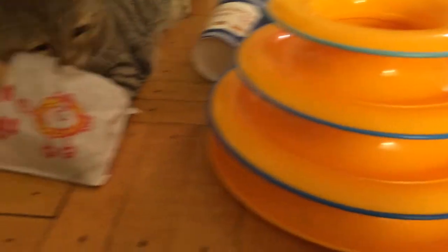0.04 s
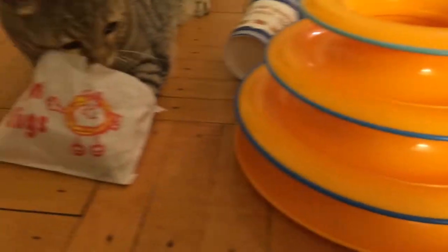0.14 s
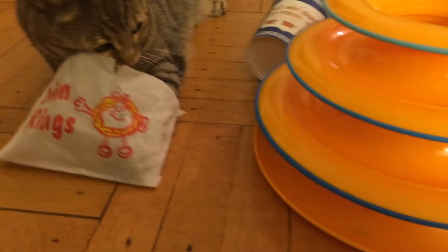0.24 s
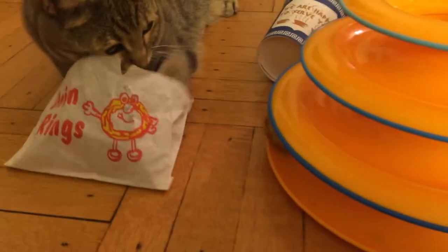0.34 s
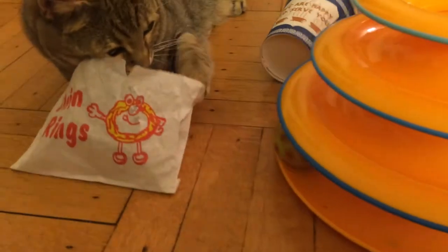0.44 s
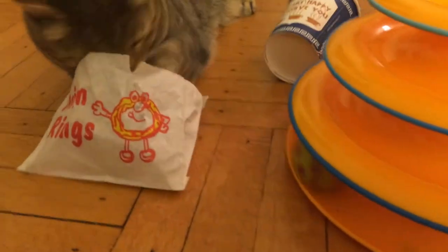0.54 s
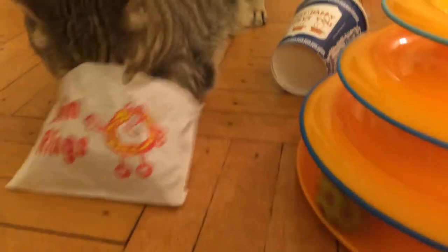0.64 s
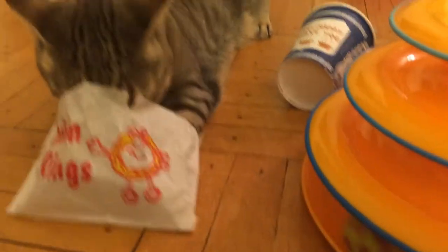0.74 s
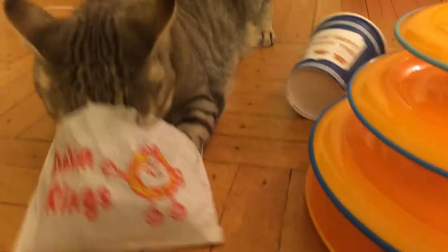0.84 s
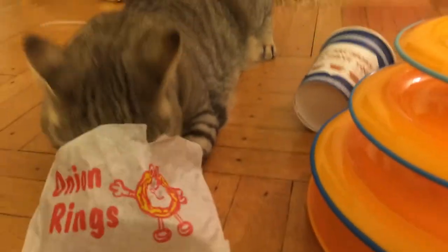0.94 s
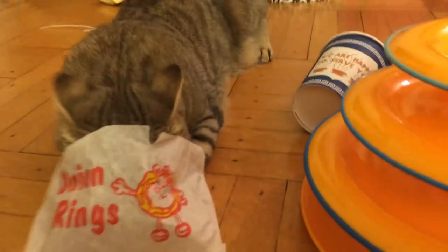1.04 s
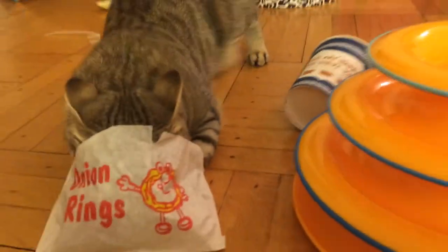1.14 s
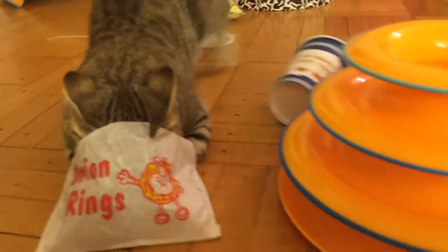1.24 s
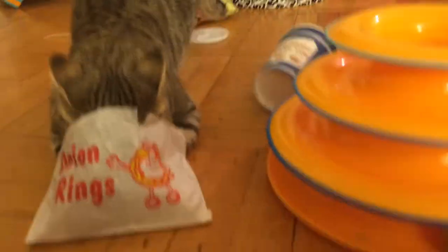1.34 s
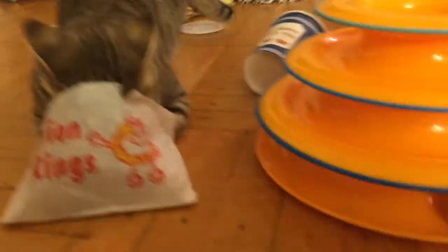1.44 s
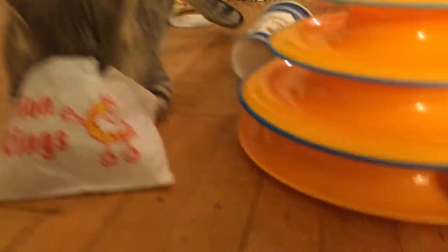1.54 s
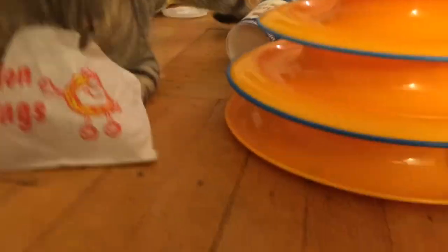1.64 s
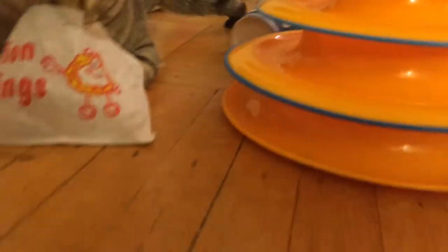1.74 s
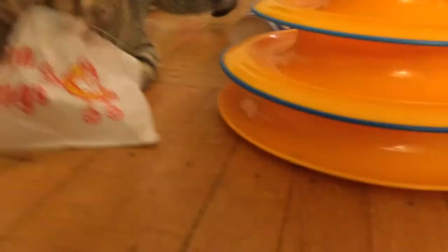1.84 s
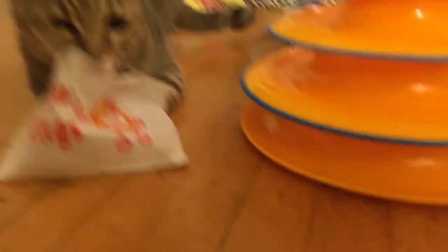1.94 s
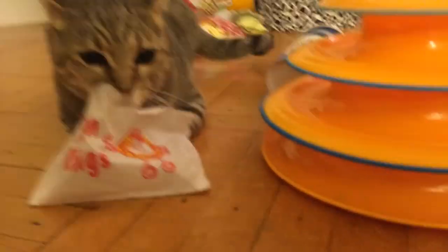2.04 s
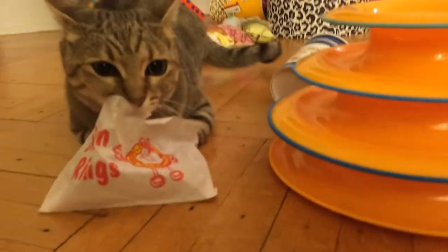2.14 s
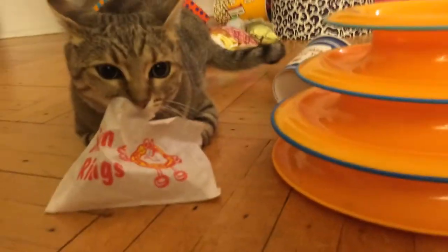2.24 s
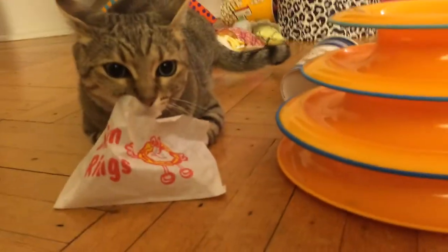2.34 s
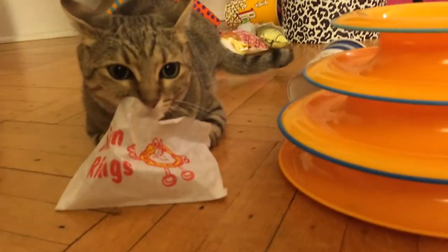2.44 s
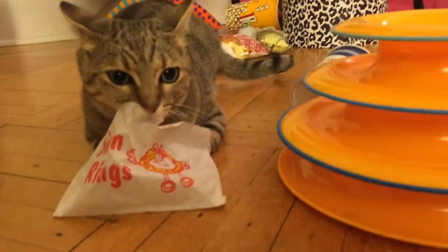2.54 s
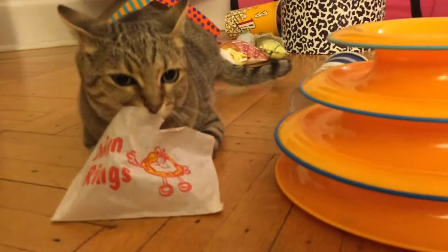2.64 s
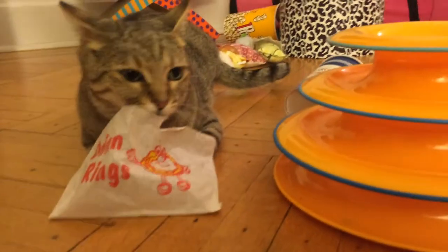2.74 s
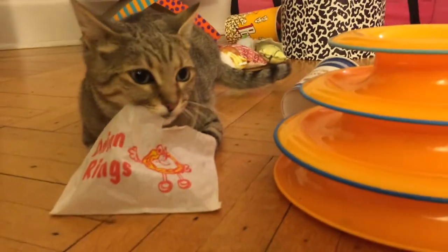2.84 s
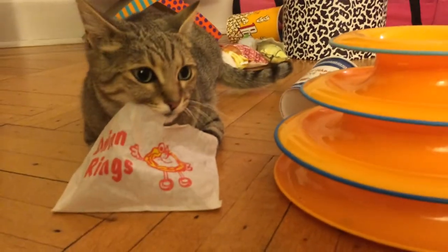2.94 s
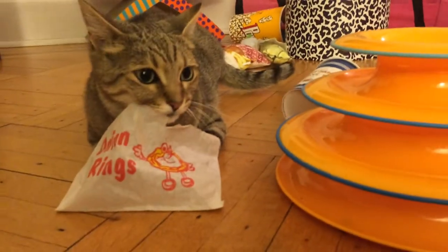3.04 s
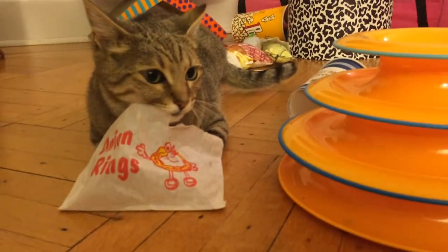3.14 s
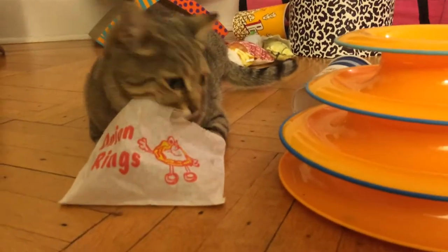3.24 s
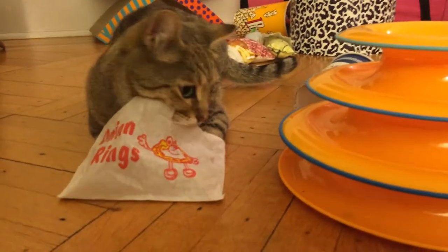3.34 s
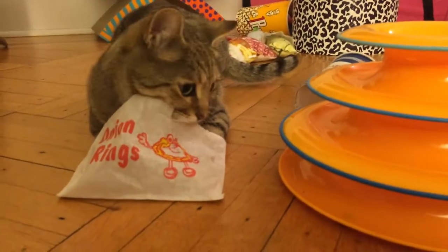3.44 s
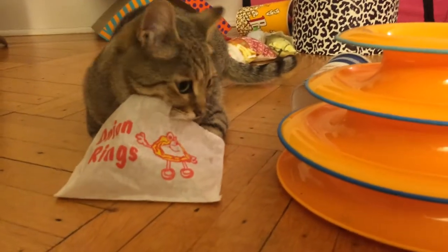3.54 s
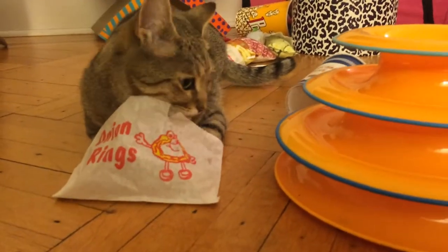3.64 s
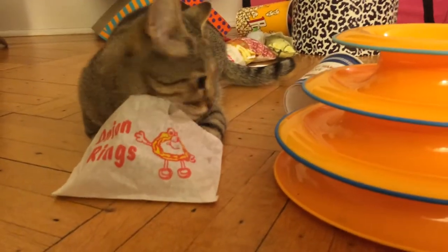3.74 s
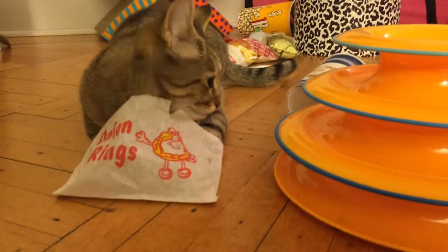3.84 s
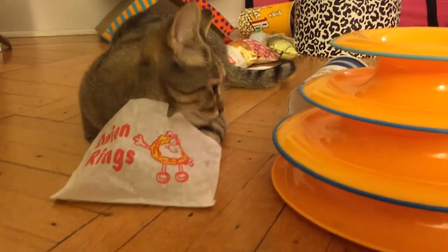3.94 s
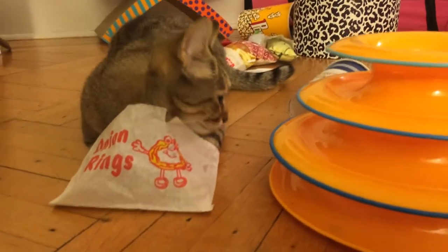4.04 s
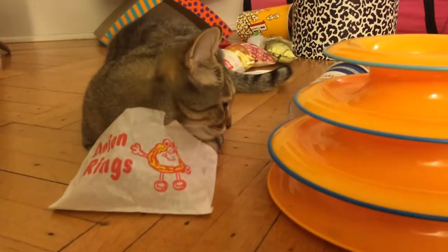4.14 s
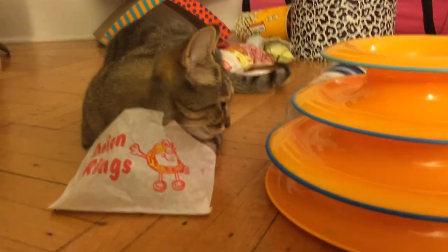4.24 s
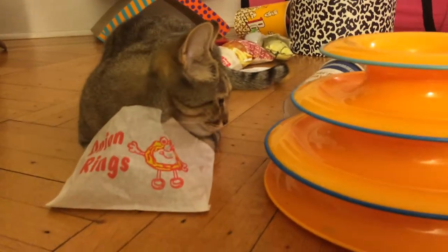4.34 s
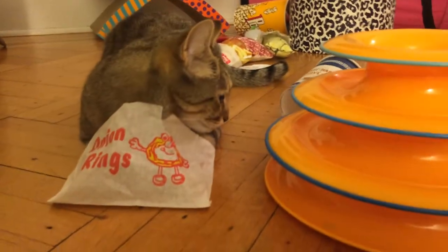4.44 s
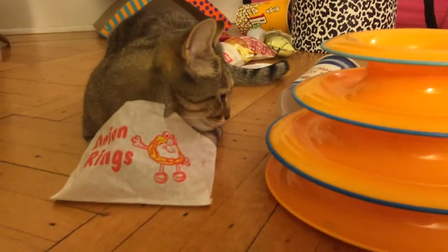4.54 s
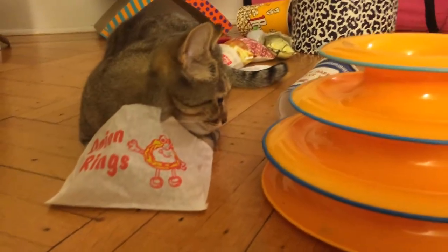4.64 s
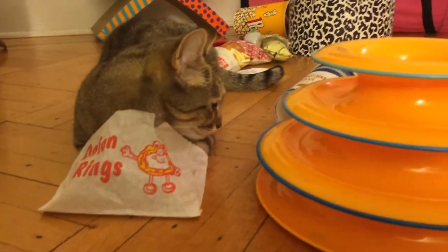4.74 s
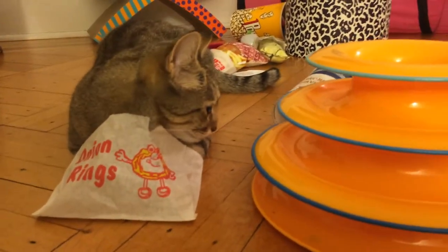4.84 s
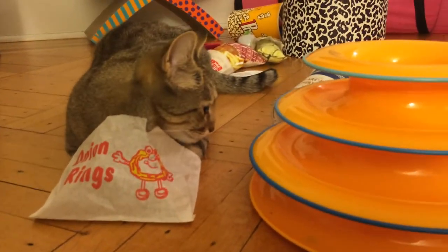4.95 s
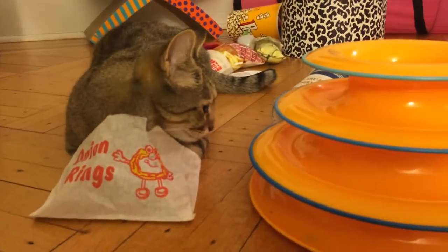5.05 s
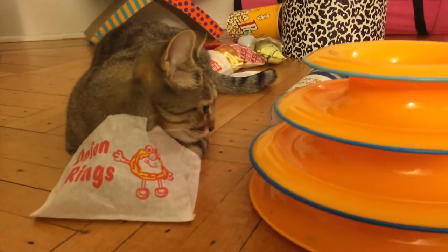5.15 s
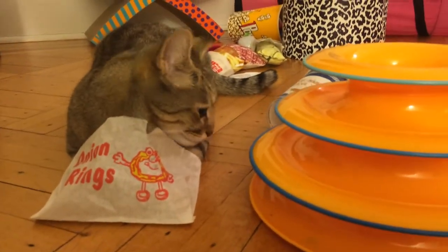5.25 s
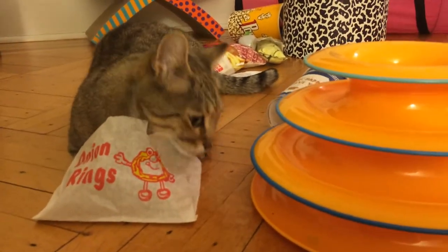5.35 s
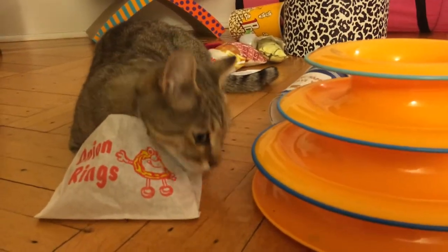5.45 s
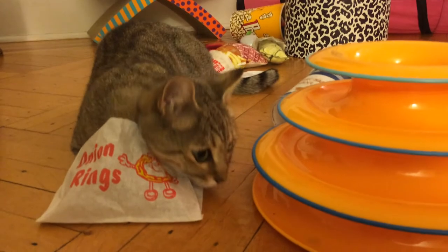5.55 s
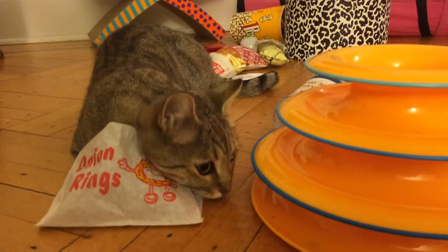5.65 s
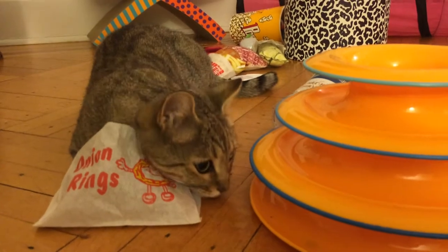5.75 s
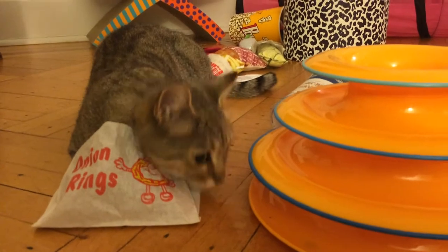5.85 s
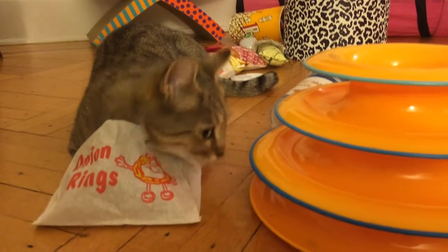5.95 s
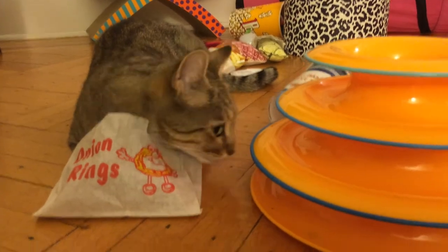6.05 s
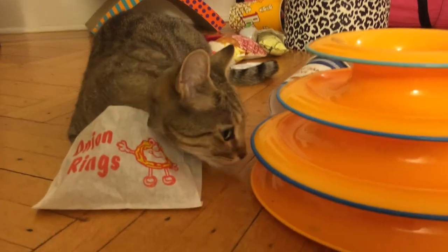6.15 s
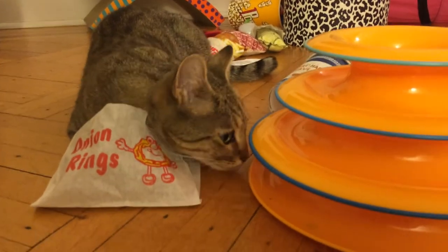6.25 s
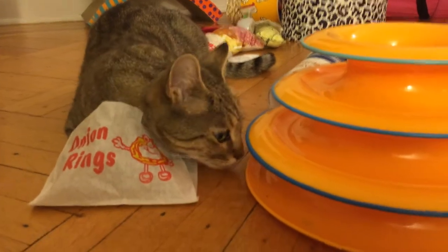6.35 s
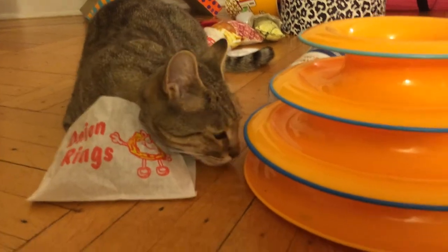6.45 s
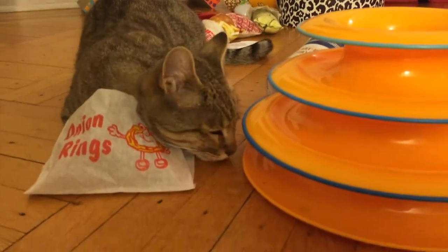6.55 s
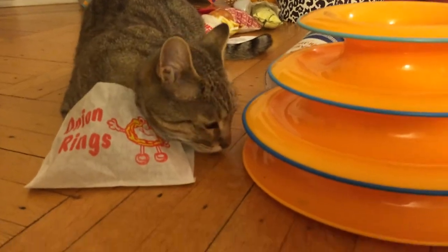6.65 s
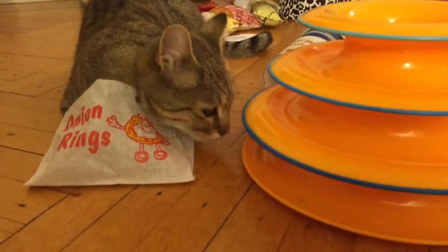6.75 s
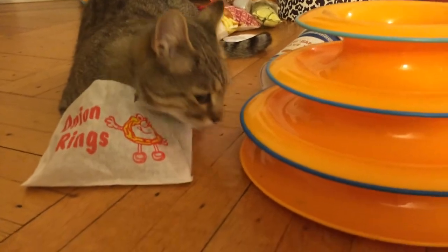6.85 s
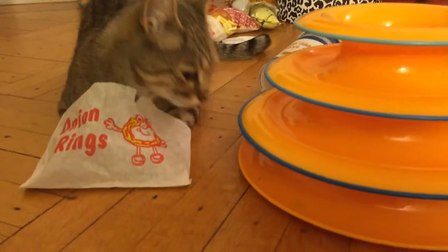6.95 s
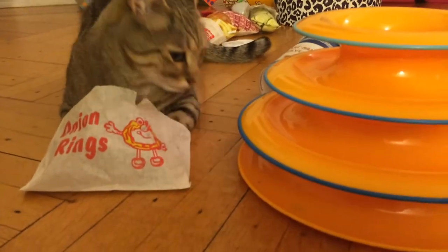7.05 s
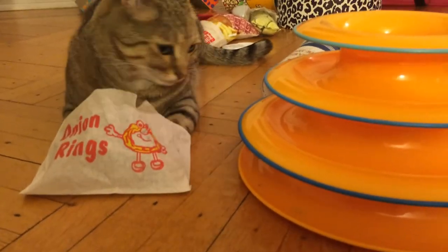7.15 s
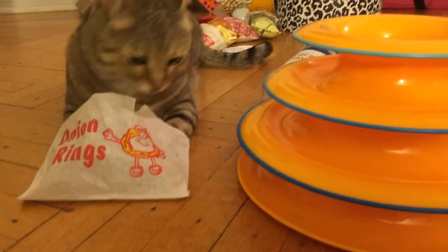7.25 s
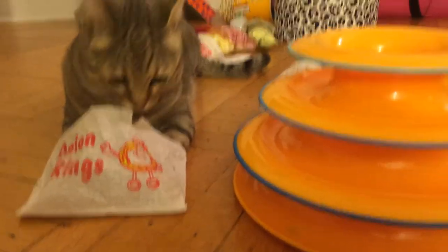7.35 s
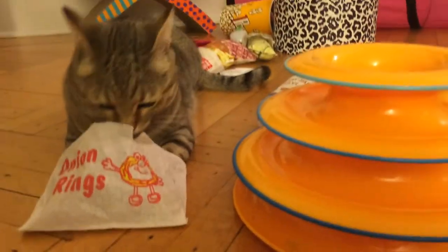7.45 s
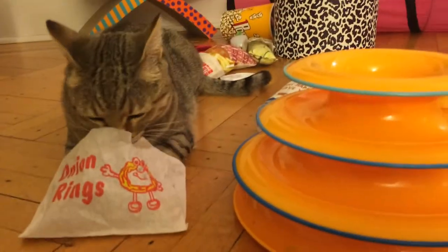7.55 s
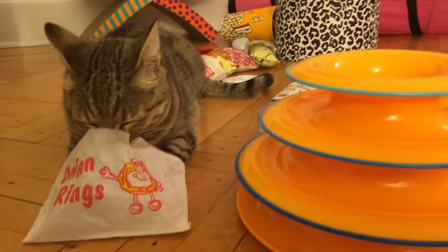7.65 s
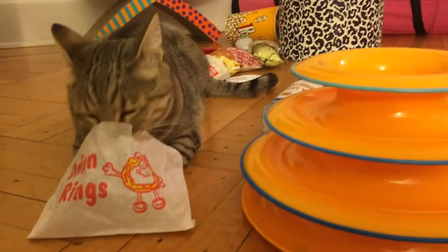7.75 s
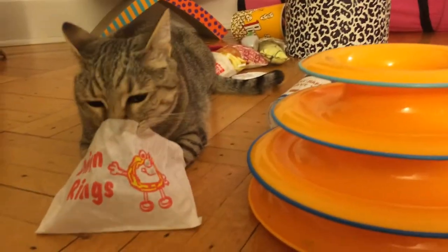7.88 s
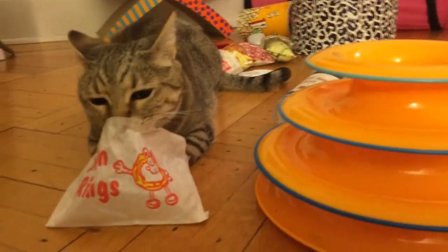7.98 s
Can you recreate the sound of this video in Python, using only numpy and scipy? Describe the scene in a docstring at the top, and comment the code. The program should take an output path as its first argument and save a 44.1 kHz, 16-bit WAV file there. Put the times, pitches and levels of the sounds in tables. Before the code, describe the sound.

Close phone pickup in a lightly reverberant room with a wooden floor and very faint low hum. From 0 to about 2.1 seconds a cat shoves into a small paper bag: ragged, bright creases snap in quick succession over grainy rustling, densest and loudest near 1 second, with hard individual cracks near 1.45, 1.9 and 2.05. Soft low bumps rumble in the boards, and a hint of hollow rolling lies underneath. The rustle drops away by 2.3. From 2.4 to 4.5 there are sparse light crinkles and gentle brushes, while something small patters softly in hollow plastic, clearest around 2.8 to 3.4 and again at 4.3. Dull, short wooden knocks come from further away at 4.65 and 6.6. Faint paper crackles and fur rubs cluster around 5.4 to 6, nearly vanish, then return from 7.4, growing a little livelier from 7.8 to the end.

```python
"""Wooden floor indoors: a cat noses, bites and leans on a small paper bag, close to a phone.
Creases snap as ragged noise bursts ringing the bag; fur and paper rub as streams of coloured slips.
Soft low-band noise bumps rumble in the boards during the shove. Two dull knocks further off ring wood
modes and the room.
Something small rolls and patters in plastic (narrow noise, dying sines) over a low household hum."""
import sys
import numpy as np
from scipy import signal
from scipy.fft import rfft, irfft, next_fast_len
from scipy.io import wavfile
from scipy.ndimage import uniform_filter1d

SR = 44100
rng = np.random.default_rng(int(sys.argv[2]) if len(sys.argv) > 2 else 0)


def digitize_waveform(pressure):
    """Quantize a signal to 16-bit integers and store it at the path in sys.argv[1].

    Rows of a 2-D input are taken as channels; values are limited to [-1, 1].
    """
    field = np.atleast_2d(pressure).T
    bounded = np.clip(field, -1, 1)
    quanta = np.round(bounded * 32767).astype(np.int16)
    wavfile.write(sys.argv[1], SR, quanta)


N = 353457

# household noise spectrum, relative: freq_hz [Hz], density_db [dB per Hz]
HOUSE_SPECTRUM = [(22, -27), (49, -18.5), (85, -13.5), (130, -15), (165, -20.5), (210, -14), (270, -22.5),
                  (400, -25.5), (600, -33.5), (1700, -39), (2500, -41), (7000, -44.5), (14700, -48)]
HOUSE_DB = -66
HUM_HZ, HUM_HALF_WIDTH_HZ, HUM_DB, HUM_WAVER_DB = 121.2, 12, -65.5, 2.5

# room tail bands: centre_hz [Hz], level_db [dB, relative], t60_s [s]
ROOM_BANDS = [(215.7, -3.5, 0.25), (527, 2, 0.13), (1040, 1.5, 0.22), (2000, 4, 0.19), (4000, -0.5, 0.38),
              (7040, -6, .28), (12300, -3, .17)]

# cat's weight landing on the boards: time_s [s], level_db [dB]
BUMPS = [(0.081, -45), (.62, -55), (.7, -51), (.83, -45.5), (0.941, -40.5), (1.1, -51), (1.33, -49),
         (1.47, -43.5), (1.508, -46.5), (1.74, -45), (1.87, -48.5), (1.95, -47), (2.041, -41.5)]
BUMP_RISE_DB_S, BUMP_FALL_DB_S, RUMBLE_DB = 699.5, 350, -61

# light object rolling in hollow plastic: start_s [s], length_s [s], level_db [dB]
ROLLS = [(0.188, .12, -66), (0.416, 0.27, -59.5), (0.803, 0.091, -57.5), (2.817, 0.096, -68.5),
         (3.127, 0.034, -66.5), (3.2, .09, -68.5), (3.352, 0.087, -70.5), (4.278, 0.19, -73),
         (4.679, 0.039, -67.5), (5.95, 0.29, -75)]
ROLL_HZ, ROLL_HALF_WIDTH_HZ, ROLL_RISE_DB_S, ROLL_FALL_DB_S = 550, 90, 250.5, 150.5

# soft taps, levels before trim: time_s [s], level_db [dB], ring_hz [Hz], thump_db [dB re level_db]
TAPS = [(2.402, -69, 653, 10), (2.638, -69.5, 400, 21), (2.809, -55.5, 550, 5), (2.871, -56, 420, 0),
        (3.022, -61, 468, -9), (3.067, -62.5, 500, -7.5), (3.124, -54, 480, -19), (3.193, -54.5, 486, -14),
        (3.239, -48, 550, -8), (3.303, -64, 600, -12), (3.351, -60.5, 470, -19), (3.413, -61.5, 583, -8),
        (4.032, -71.5, 483, -8.5), (4.307, -59.5, 493, -12), (4.355, -58, 487, -13),
        (4.406, -64.5, 490, -12.5), (4.519, -70.5, 560, 0.5), (4.879, -66.5, 632, -2), (6.42, -67, 400, 4),
        (7.489, -61, 360, -13.5)]

# far knocks: time_s [s], peak_db [dB]
KNOCKS = [(4.655, -29.5), (6.601, -25.5)]
# modes of the knocked wood: freq_hz [Hz], level_db [dB, relative], t60_s [s]
WOOD_MODES = [(223.7, -7.5, 0.029), (294.5, -9, 0.02), (420, -6.5, 0.023), (593, 0.5, 0.011),
              (1013, -6.5, 0.012), (1420, -7.5, 0.011), (1950, 1.5, 0.0044), (2500, 3.5, 0.0024),
              (3100, -11, 0.0051), (3690, -1, 0.0032), (4744, -10, 0.0039), (5370, -11, 0.0032),
              (6740, -8, 0.0013)]

# head shoved into the bag, levels before trim: time_s [s], treble_db [dB], body_db [dB]
SHOVE = [(0, -55, -57), (.12, -53, -49.5), (.3, -62.5, -52.5), (.42, -54, -52.5), (.56, -57.5, -57),
         (.62, -48.5, -48), (.83, -47, -46), (.9, -52.5, -49), (.97, -40, -37.5), (1.06, -42, -46.5),
         (1.24, -52.5, -48), (1.41, -53, -49.5), (1.5, -46, -46.5), (1.65, -39, -53), (1.73, -51, -59.5),
         (1.84, -57.5, -52), (2.05, -50.5, -43), (2.25, -72.5, -69)]
# brushes of fur and chin, levels before trim: start_s [s], length_s [s], treble_db [dB], body_db [dB]
BRUSHES = [(2.621, 0.18, -64.5, -64), (2.819, .15, -62.5, -66), (3.225, .18, -62.5, -61.5),
           (3.528, .05, -75, -65), (3.642, .25, -72.5, -67.5), (3.88, 0.14, -72.5, -76.5),
           (4.121, .17, -70, -70.5), (4.269, 0.045, -67.5, -68.5), (4.878, .15, -84, -67.5),
           (5.37, .15, -61.5, -68), (5.547, 0.22, -59, -61), (5.916, .1, -63, -62.5),
           (6.048, .12, -72.5, -63.5), (6.196, 0.11, -65, -67), (6.817, 0.15, -68.5, -79.5),
           (6.969, .04, -71.5, -61.5), (7.02, 0.11, -65, -72), (7.442, .07, -67, -67),
           (7.624, .12, -62.5, -63.5), (7.793, .12, -56, -54), (7.934, .1, -59, -58)]
BRUSH_RISE_DB_S, BRUSH_FALL_DB_S, REST_DB, SHOVE_ENDS_S = 300.5, 150.5, -82, 2.3
SHOVE_SPREAD_DB, BRUSH_SPREAD_DB, SLIPS_PER_S = 3, 1.5, 500  # spread: scatter of slip sizes
# rustle colour, body of the bag: freq_hz [Hz], density_db [dB per Hz, relative]
BODY_COLOUR = [(200, -26.5), (330, -4), (550, 0.5), (1000, 1), (2000, -3), (3000, -4), (5000, -20.5),
               (9000, -32)]
# rustle colour, thin paper and fur: freq_hz [Hz], density_db [dB per Hz, relative]
SKIN_COLOUR = [(1200, -27.5), (2500, -9), (4000, -7.5), (6500, 2.5), (9000, 2), (12000, -2.5), (15500, 1.5)]

# clearest creases, levels before trim: time_s [s], panel_db [dB], panel_hz [Hz],
# hollow_db [dB re panel], hollow_hz [Hz], treble_db [dB re panel], top_db [dB re panel]
CREASES = [(0.0454, -42, 3800, -5, 1290, 3.5, -4), (0.0545, -42.5, 3680, -12, 493, -9, -6.5),
           (0.0933, -34.5, 2360, -14, 580, -5, -10), (0.1007, -33.5, 3480, 4, 655, -1.5, -15),
           (0.1204, -32.5, 2480, -8, 544, -7.5, -2.5), (0.1367, -34, 1300, -4, 1236, -10, -17.5),
           (0.1514, -44.5, 1980, -12, 870, -4, -16), (0.2077, -25.5, 3360, -15.5, 1200, -14, -11),
           (0.2228, -36.5, 3300, -4.5, 965, -13.5, -21), (0.2423, -34.5, 2480, -20, 800, -6, -20),
           (0.2595, -39, 2720, -7, 764, -10, -15), (0.2689, -39.5, 2150, -2.5, 910, 1, -4),
           (0.289, -47, 2250, -10, 1090, -9, -10), (0.3042, -34, 3170, -25, 1170, -18, -22),
           (0.3559, -38, 1500, -8, 705, -2.5, -3), (0.3729, -42, 3460, -6, 1270, -2, 3),
           (0.3794, -29, 3240, -9, 1100, -4.5, -3), (0.398, -26.5, 3430, -16, 1050, -4.5, 4.5),
           (0.4054, -30.5, 3670, -18, 1230, -17, -12), (0.4251, -39, 2200, -2, 755, -2, -11),
           (0.4747, -37, 2650, -17, 507, -3, -1), (0.4929, -29.5, 1570, -16, 1310, -24, -31),
           (0.5028, -40, 3230, -24, 600, -16, -16), (0.5227, -33.5, 2500, -15, 506, -6.5, -14),
           (0.5929, -34.5, 1900, -6.5, 1080, -2.5, -10.5), (0.6519, -37, 2030, -14, 616, -16, -13),
           (0.6938, -26.5, 1880, -14, 1120, 1, 8), (0.7511, -35, 2110, -3.5, 920, -7, -5),
           (0.7801, -25.5, 3330, -16, 557, -2.5, -4), (0.794, -40, 1850, -9, 902, -6, -15),
           (0.819, -28, 1890, -9.5, 500, -15, -15), (0.839, -27.5, 3760, -7, 829, -4, -4),
           (0.846, -33, 3800, -8.5, 503, -4, -9), (0.8606, -34.5, 3400, -13.5, 759, -8, -5),
           (0.8838, -28.5, 3120, -17, 1040, -11.5, -13), (0.9219, -36.5, 1840, -10.5, 950, -8, 1),
           (0.9334, -27.5, 2840, -9, 730, 1.5, -17), (0.9388, -19, 3240, -17, 860, -12, -5),
           (0.9449, -20.5, 1880, -11, 990, -10, 1), (0.9524, -15, 3250, -10.5, 960, -9.5, -20),
           (0.9592, -19, 2920, -15, 705, -17, -20), (0.975, -27, 2810, -18, 1150, -14, -15),
           (0.9851, -21, 1740, -12, 1040, -5.5, -8), (0.9902, -21, 3530, -21, 923, -19, 4.5),
           (1.0078, -25, 1800, -13, 953, -3, -6), (1.0144, -19.5, 2000, -21, 654, -3.5, -2.5),
           (1.0253, -25, 1860, -20, 580, -5.5, -12), (1.036, -18, 1820, -28, 1300, -14, -15),
           (1.042, -26.5, 3070, -22.5, 977, -7, 2.5), (1.0498, -23.5, 3090, -27, 853, -2.5, -12),
           (1.0717, -29, 2960, -26, 990, -6, -11), (1.094, -40, 3380, -30, 930, 9, -4),
           (1.1035, -20, 2556, -15, 1330, -6, -5), (1.124, -18, 2650, -20, 1300, -7, -6),
           (1.134, -31, 2640, -22, 1290, -14, -16), (1.156, -36, 2230, -27.5, 463, -1, 1),
           (1.1714, -30.5, 2030, -30, 1070, -9, -4), (1.1775, -27.5, 1920, -30, 1180, -7, -11),
           (1.1858, -32, 3300, -5.5, 580, -9, -1), (1.1942, -33.5, 1850, -14, 958, -5, 2),
           (1.2027, -33.5, 1470, -17.5, 1300, 1, 6.5), (1.2069, -24, 2030, -27, 931, -4, -8),
           (1.2105, -24, 1910, -19, 1040, -6, -17), (1.2174, -29.5, 1740, -18.5, 1310, -6, -14),
           (1.2581, -28.5, 2700, -32, 926, -3, -5), (1.265, -25.5, 3300, -27, 607, -9, -4),
           (1.2777, -31, 2030, -31, 1060, -4, -7), (1.2966, -32, 3410, -20, 1210, -6, -3),
           (1.3278, -24.5, 2050, -11, 635, -13, -11), (1.3398, -29.5, 2790, -16, 570, 2, 4),
           (1.3449, -32.5, 1960, -11, 1060, -1, -8), (1.4189, -35.5, 2070, -16, 643, 0, -12),
           (1.424, -33.5, 1810, -10, 1180, -3.5, -14), (1.4424, -30.5, 2000, -7, 705, -6, -23),
           (1.4546, -14, 2170, -17, 714, -8.5, -9), (1.4849, -20, 1950, -21.5, 398, -9.5, -6),
           (1.4924, -38, 1930, -6, 577, -1, -4), (1.508, -30.5, 1960, -2.5, 740, -0.5, 1),
           (1.5404, -36, 2240, -13, 912, -17, -15), (1.5932, -27, 2260, -4, 860, -18, -16),
           (1.6274, -23, 2060, -38, 973, -21, -11), (1.6625, -34, 2980, -17, 826, -21, -10),
           (1.694, -38.5, 2290, -7.5, 486, -16, -15), (1.7428, -31.5, 2230, 5, 840, -3, -8),
           (1.7593, -37, 1440, -3, 770, -2, 4), (1.7662, -29.5, 2010, -7, 1140, -5, -7),
           (1.8072, -45, 2000, -11, 888, -1, -8), (1.8235, -37, 1440, -8.5, 845, -5.5, -18),
           (1.8552, -39, 2000, -2, 450, -14, -16), (1.8801, -15.5, 2210, -10, 620, -14.5, -25),
           (1.8956, -40.5, 2210, 2, 797, 4, -4), (1.9096, -31, 1920, -14, 1150, -13, -13),
           (1.9196, -37.5, 1950, -4.5, 633, -2, -5), (1.9277, -32, 3310, -9.5, 1220, 2, -4),
           (1.9391, -19.5, 3050, -7.5, 851, -8.5, 4), (1.9467, -22.5, 1890, -13, 711, -9, -13),
           (1.9591, -19.5, 2360, -11.5, 1240, -2.5, -17), (1.9992, -29, 1450, -5, 630, -12, -12),
           (2.0136, -17, 2100, -19, 860, -10, -18), (2.0257, -19.5, 1530, -9, 610, -9.5, -9),
           (2.0442, -13, 2070, -18, 1260, -6.5, -1.5), (2.0694, -18.5, 3400, -10, 900, -8, -8.5),
           (2.404, -57.5, 2000, -1.5, 644, -13.5, -11.5), (2.5277, -50, 1365, -5.5, 1267, -24.5, -22.5),
           (2.5896, -56.5, 3400, -16, 503, -8, -5.5), (2.639, -37.5, 2330, -20, 393, -7, -11.5),
           (2.6588, -29, 2370, -11.5, 845, -14.5, -24), (2.7547, -41.5, 1560, -15, 743, -10.5, -11),
           (2.81, -50, 1490, 1, 431, -15, -11), (2.9087, -53, 3400, -9, 544, -6, 6),
           (2.9173, -41.5, 2460, -15, 940, -6, -13), (2.9586, -35, 2850, -14, 910, -5.5, -4.5),
           (3.2839, -45, 1590, -15, 596, -13.5, -11.5), (3.3283, -33.5, 2530, -20, 960, -4.5, -5),
           (3.4989, -63, 1320, 7, 1290, -8, -11), (3.5167, -48, 1590, -9.5, 1000, -8.5, -10),
           (3.625, -65, 2000, -5, 390, 0, -4), (3.682, -33.5, 2820, -16, 1010, -16, -20),
           (3.7965, -30.5, 2380, -9.5, 744, -24.5, -24), (3.8458, -41, 1290, -8, 1000, -10, -15.5),
           (4.1958, -51.5, 3700, -5.5, 653, -14.5, -14.5), (4.263, -37, 2770, -3, 950, -2.5, -9.5),
           (4.4424, -65.5, 1680, 1, 412, -7, -4.5), (5.373, -51, 2370, -12.5, 787, 3.5, -6),
           (5.435, -52.5, 2500, -14, 826, -4, 0), (5.484, -41, 1340, -5, 1244, -17, -18),
           (5.5565, -38, 2760, -24, 635, -14, -16), (5.5922, -39.5, 3710, -10, 950, -13, -11),
           (5.6038, -41, 3430, -9.5, 406, -15, -14), (5.6131, -39.5, 1390, -9, 1260, -11, -18),
           (5.6732, -49.5, 1380, -2, 1286, -11, -13), (5.7193, -52, 1320, -20, 1220, -7, -7),
           (5.7466, -44, 2110, -19, 842, -11, 2), (5.7574, -53, 1430, 0, 918, 4, 1),
           (5.7701, -33, 3380, -18, 875, -8.5, 5.5), (5.805, -47.5, 2010, -18, 931, -10, -15),
           (5.907, -50.5, 1430, 2, 619, -8, -19), (5.9104, -50, 1330, -2, 907, -10, -24),
           (6.0015, -70, 2020, 4, 931, 3, 3), (6.0276, -33.5, 2320, -13, 940, -10.5, -20),
           (6.3257, -53, 1840, 4.5, 740, -18, -18), (6.8817, -66.5, 3460, -11, 412, -1, -0.5),
           (6.9646, -41, 2640, -11.5, 1300, -15.5, -15.5), (6.9779, -39, 1300, -6, 930, -24, -23),
           (7.0978, -66.5, 3310, -15.5, 519, -2.5, -7), (7.1167, -59, 3030, -10, 1070, -4, -8),
           (7.142, -54.5, 1324, -6, 1220, -3, -8.5), (7.2072, -62.5, 3100, -10.5, 400, 1.5, -0.5),
           (7.3704, -60, 1530, -2.5, 816, -11, -16), (7.418, -57.5, 2860, -7, 958, -7, -4.5),
           (7.4398, -45, 2150, -5, 840, -1, -10), (7.4753, -44, 2230, -8.5, 1010, -2.5, 5.5),
           (7.5591, -53, 1420, -8, 835, -11.5, -13), (7.6832, -51, 1300, -4, 1240, -11, -18),
           (7.6922, -41, 3400, -11, 1280, -14, -10), (7.7114, -55, 2240, -2, 864, 2, 6),
           (7.778, -29.5, 2980, -4, 936, -7.5, -7), (7.8045, -44, 2290, -5.5, 1000, -23, -18),
           (7.8329, -44, 2050, -9, 597, -12, -12), (7.8617, -43, 1310, -0.5, 970, -7, -3),
           (7.881, -38, 3220, -11.5, 1026, -4, -2), (7.935, -38, 2140, -14.5, 720, -11.5, -11),
           (7.9811, -44.5, 2540, -20, 1050, 1.5, -2)]
# hollow, panel, treble and top bands of a snap: low_hz [Hz], high_hz [Hz]
SNAP_BANDS = [(400, 1300), (1300, 3800), (3800, 7500), (7500, 12000)]
HOLLOW_DB, TREBLE_DB, TOP_DB = 1, 5.5, 5.5  # added to those columns
SNAP_T60_S, SHORTER_PER_DB = 0.012, 0.22  # t60 at equal top and hollow; brighter snaps end sooner
STRAIN_DB, STRAIN_T60_S = -7.5, 0.031  # creak before the snap, re settling
SETTLE_DB, SETTLE_T60_S = -12, 0.057  # rustle after the snap
# lesser creases: peak re rubbing, half-range of peak, means re panel
SMALL_SNAPS, SMALL_DB, SMALL_SCATTER_DB = 70, 6, 0.5
SMALL_HOLLOW_DB, SMALL_TREBLE_DB, SMALL_TOP_DB = -13.5, -9, -8
SMALL_CROWDING = 0.33  # snap density follows rubbing gain to this power

EDGE_HZ, TOP_HZ = 15350, 16500


def undb(db):
    """Gain of a level in dB."""
    return 10 ** (np.asarray(db) / 20)


def level(x, db):
    """Scale to an rms level."""
    return x * undb(db) / np.sqrt(np.mean(x ** 2))


def band(x, lo, hi, order=2):
    """Causal band-pass along the last axis."""
    sos = signal.butter(order, [lo, min(hi, TOP_HZ)], "band", fs=SR, output="sos")
    return signal.sosfilt(sos, x)


def colour(x, table):
    """Shape the spectrum along (Hz, dB) points; rms 1."""
    hz, db = np.transpose(table)
    size = next_fast_len(N)
    bin_hz = np.arange(size // 2 + 1) * SR / size
    gain = undb(np.interp(np.log(bin_hz + 1), np.log(hz), db))
    return level(irfft(rfft(x, size) * gain, size)[:N], 0)


def peak(rows, db):
    """Scale each row to its own peak level."""
    return rows / np.abs(rows).max(axis=1, keepdims=True) * undb(db)[:, None]


def fade(t60_s, size):
    """One exponential decay a row, t60 held within 1 ms to 1 s."""
    t60_s = np.clip(np.reshape(t60_s, (-1, 1)), 1 / 1000, 1)
    return np.exp(-np.log(1000) * np.arange(size) / SR / t60_s)


def ring(hz, t60_s, size):
    """One dying sine a row."""
    return np.sin(2 * np.pi * np.outer(hz, np.arange(size) / SR)) * fade(t60_s, size)


def place(times_s, rows):
    """Add each row to the time line at its time."""
    out = np.zeros(N + rows.shape[1])
    for s, row in zip(times_s, rows):
        start = int(s * SR)
        out[start:start + len(row)] += row
    return out[:N]


def curves(table):
    """Columns of a table joined by straight lines in time."""
    s, *columns = np.transpose(table)
    return [np.interp(np.arange(N) / SR, s, c) for c in columns]


def walk(rate_hz):
    """Random levels joined by straight slews, one per 1 / rate_hz; spread near 1."""
    k = int(SR / rate_hz)
    return uniform_filter1d(np.repeat(rng.standard_normal(N // k + 1), k), k)[:N]


def swell(start_s, length_s, db, rise_db_s, fall_db_s):
    """Level in dB of events that rise, hold and fall in straight lines; the loudest leads."""
    t = np.arange(N) / SR
    levels = []
    for s, n, d in zip(start_s, length_s, db):
        drop = np.maximum(rise_db_s * (s - t), fall_db_s * (t - s - n)).clip(0)
        levels.append(d - drop)
    return np.max(levels, axis=0)


def household():
    """Half-octave noise bands that flicker independently, plus a wavering narrow-band hum."""
    out = 0
    hz, db = np.transpose(HOUSE_SPECTRUM)
    for f in 25 * 2 ** np.arange(0, 9.4, .5):
        noise = band(rng.standard_normal(N), f / 2 ** .25, f * 2 ** .25)
        band_db = np.interp(np.log(f), np.log(hz), db) + 1.2 * walk(3.3)
        out = out + undb(band_db) * noise
    hum = band(rng.standard_normal(N), HUM_HZ - HUM_HALF_WIDTH_HZ, HUM_HZ + HUM_HALF_WIDTH_HZ)
    hum = hum * undb(HUM_WAVER_DB * walk(7))
    return level(out, HOUSE_DB) + level(hum, HUM_DB)


def room(x, size=20000):
    """Dense diffuse tail that builds over a few milliseconds and dies band by band."""
    tail = np.zeros(size)
    for hz, db, t60_s in ROOM_BANDS:
        noise = band(rng.standard_normal(size), hz / 1.4, hz * 1.387)
        tail += undb(db) * noise * fade(t60_s, size)[0]
    tail = tail * (1 - fade(0.0063, size)[0])
    return signal.fftconvolve(x, tail / np.sqrt(np.sum(tail ** 2)))[:N]


def rumble():
    """Paws and chest press the boards: soft low-band noise bumps over a bed held during the shove."""
    s, db = np.transpose(list(BUMPS) + [(0, RUMBLE_DB)])
    held_s = (s == 0) * SHOVE_ENDS_S
    gain_db = swell(s, held_s, db, BUMP_RISE_DB_S, BUMP_FALL_DB_S) + 1.5 * walk(30)
    return undb(gain_db) * level(band(rng.standard_normal(N), 69, 270, order=3), 0)


def rolling():
    """A bumpy roll hums in the shell: narrow noise with a jittering level."""
    gain_db = swell(*np.transpose(ROLLS), ROLL_RISE_DB_S, ROLL_FALL_DB_S) + 2.4 * walk(40)
    hum = band(rng.standard_normal(N), ROLL_HZ - ROLL_HALF_WIDTH_HZ, ROLL_HZ + ROLL_HALF_WIDTH_HZ)
    return undb(gain_db) * level(hum, 0)


def patter(size=3000):
    """Soft pushes ring two modes of a hollow plastic shell, with a thump through the floor."""
    s, db, hz, thump_db = np.transpose(TAPS)
    push = np.hanning(60)[None]
    shell = ring(hz, 0.045, size) + 0.22 * ring(1.26 * hz, 0.045, size)
    taps = peak(signal.fftconvolve(shell, push), db + 7.0)[:, :size]
    thump = band(ring(np.full(len(s), 205), 0.031, size), 117, 550)
    return place(s, taps + peak(thump, db + thump_db + 6.0))


def knocks(size=3000):
    """Something hard meets wood: rattling contact, then a duller push, into the same modes.
    Returns the direct sound and the bare modes that feed the room."""
    s, db = np.transpose(KNOCKS)
    hz, mode_db, t60_s = np.transpose(WOOD_MODES)
    body = (undb(mode_db) @ ring(hz, t60_s, size))[None]
    contact = rng.standard_normal((len(s), 200)) * undb(-11.5) * np.hanning(200) ** .5
    contact[:, 40] -= 1.2
    contact[:, 120:140] += 0.22 * np.hanning(20)
    struck = signal.fftconvolve(contact, body)[:, :size]
    direct = peak(band(struck, 170, 10400), db)  # a small object moves little deep air
    return place(s, direct), place(s, peak(body.repeat(len(s), axis=0), db))


def effort():
    """Treble and body dB of the rubbing: shove, then brushes, over a faint creep."""
    start_s, length_s, *dbs = np.transpose(BRUSHES)
    shove = curves(list(SHOVE) + [(SHOVE[-1][0] + 0.34, REST_DB, REST_DB)])
    brushes = [swell(start_s, length_s, db, BRUSH_RISE_DB_S, BRUSH_FALL_DB_S) for db in dbs]
    return [np.maximum(a, b) for a, b in zip(shove, brushes)]


def settling(size=8000, count=1500):
    """Paper strains before each clear snap and rustles on after; power for treble and body."""
    s, db, _, _, _, treble_db, _ = np.transpose(CREASES)
    strain = undb(STRAIN_DB) * fade(STRAIN_T60_S, count)[:, ::-1]
    shape = np.hstack([strain, fade(SETTLE_T60_S, size)]) ** 2
    powers = []
    for d in (db + treble_db + TREBLE_DB, db):
        powers.append(place(s - count / SR, undb(2 * (d + SETTLE_DB))[:, None] * shape))
    return powers


def rubbing(treble, body):
    """A stream of tiny slips, a few much larger, coloured by the bag's body and its thin skin."""
    chance = rng.random((2, N))
    shoving = np.arange(N) < SHOVE_ENDS_S * SR
    spread_db = np.where(shoving, SHOVE_SPREAD_DB, BRUSH_SPREAD_DB)
    slips = (chance[0] < SLIPS_PER_S / SR) * undb(-spread_db * np.log(chance[1]))
    power = slips ** 2 * (4.5 - spread_db * np.log(10) / 10)  # slightly less for a wider spread
    smear = fade(0.004, size=600)[0] ** 2
    crackle = signal.fftconvolve(power, smear)[:N].clip(0)
    share = spread_db / 2.2  # stiff paper crackles, fur on paper hisses more evenly
    grain_power = share * crackle / crackle.mean() + (1 - share).clip(0)
    grain = rng.standard_normal(N) * np.sqrt(grain_power)
    body_rub = colour(grain, BODY_COLOUR) * body * undb(-7.0 + 0.5 * walk(25))
    skin_rub = colour(grain, SKIN_COLOUR) * treble * undb(-2.0 + 0.49 * walk(17))
    return body_rub + skin_rub


def small_snaps(rub_db):
    """Lesser creases by chance, denser and louder with the rubbing; columns as CREASES."""
    even = rng.random((SMALL_SNAPS, 4)).T
    bell = rng.standard_normal((SMALL_SNAPS, 3)).T
    crowd = np.cumsum(undb(SMALL_CROWDING * rub_db))
    quantile = (np.arange(SMALL_SNAPS) + even[0]) / SMALL_SNAPS
    at = np.searchsorted(crowd / crowd[-1], quantile).clip(0, N - 1)
    (low_hz, _), (mid_hz, high_hz) = SNAP_BANDS[:2]
    return np.array([
        at / SR,
        rub_db[at] + SMALL_DB + SMALL_SCATTER_DB * (2 * even[3] - 1),
        mid_hz + (high_hz - mid_hz) * even[1],
        SMALL_HOLLOW_DB + 5 * bell[0],
        low_hz + (mid_hz - low_hz) * even[2],
        SMALL_TREBLE_DB + 4 * bell[1],
        SMALL_TOP_DB + 4 * bell[2]]).T


def snaps(table, size=1400):
    """A crease buckles in a short ragged burst that rings the bag's hollow and the panel beside it.
    Also returns the room feed: from all sides the single rings average out to a plain click."""
    s, panel_db, panel_hz, hollow_db, hollow_hz, treble_db, top_db = table.T
    t60_s = SNAP_T60_S * undb(-SHORTER_PER_DB * (top_db - hollow_db))
    hollow_db = panel_db + hollow_db + HOLLOW_DB
    high_db = panel_db + treble_db + TREBLE_DB
    top_db = panel_db + top_db + TOP_DB

    chance = rng.standard_normal((len(s), 2, size))
    ragged = undb(9 * uniform_filter1d(chance[:, 1], size=12))  # stutters within a millisecond
    envelope = fade(np.clip(t60_s, 1 / 300, 1 / 25), size) * (1 - fade(0.001, size))
    burst = chance[:, 0] * ragged * envelope
    low, mid, high, top = (band(burst, lo, hi) for lo, hi in SNAP_BANDS)
    hollow = signal.fftconvolve(low, ring(hollow_hz, 0.017, size), axes=1)[:, :size]
    panel = signal.fftconvolve(mid, ring(panel_hz, 0.0072, size), axes=1)[:, :size]
    rows = peak(low, hollow_db - 15.0) + peak(hollow, hollow_db + 1.0)
    rows = rows + peak(panel, panel_db - 1.5) + peak(mid, panel_db - 20.5)
    rows = rows + peak(high, high_db + 4) + peak(top, top_db - 0.5)

    impulse = np.arange(size) == 0
    clicks = peak(np.array([band(impulse, lo, hi) for lo, hi in SNAP_BANDS]), np.zeros(4))
    strength = undb(np.array([hollow_db, panel_db - 1.5, high_db + 4.0, top_db - 3]).T)
    strength = strength * np.sqrt(t60_s[:, None] / 0.0044)  # longer burst, more energy at equal peak
    return place(s, rows), place(s, strength @ clicks)


def scene():
    """Near paper with little room, far knocks with much."""
    treble_db, body_db = effort()
    table = np.vstack([CREASES, small_snaps((treble_db + body_db) / 2)])
    treble_power, body_power = settling()
    treble = np.sqrt(undb(2 * treble_db) + treble_power)
    body = np.sqrt(undb(2 * body_db) + body_power)
    taps = patter() + rolling()
    far, far_round = knocks()
    rub = rubbing(treble, body)
    creases, creases_round = snaps(table)
    feed = undb(-16.0) * creases_round + undb(-9.0) * rub + undb(0.5) * far_round + undb(-10) * taps
    return (household() + rumble() + taps + far + rub + creases + room(feed))[None]


def record(dry):
    """The phone drops steeply above its edge and cuts the top: two elliptic low-passes."""
    soft = signal.sosfilt(signal.ellip(7, .3, 32, EDGE_HZ, fs=SR, output="sos"), dry)
    return signal.sosfilt(signal.ellip(10, .2, 80, TOP_HZ, fs=SR, output="sos"), soft)


dry = scene()
out = record(dry)
digitize_waveform(out)
```